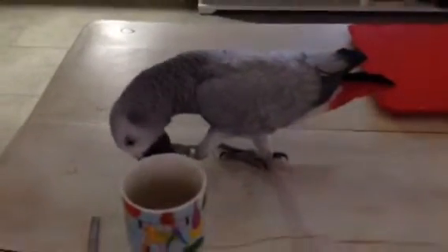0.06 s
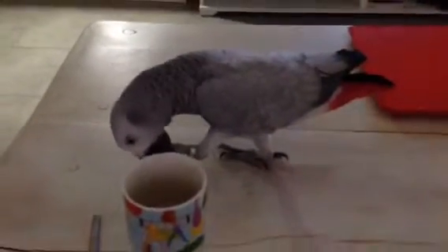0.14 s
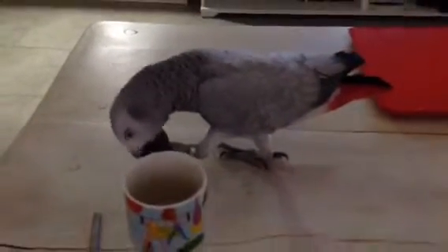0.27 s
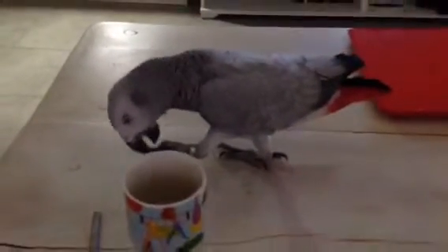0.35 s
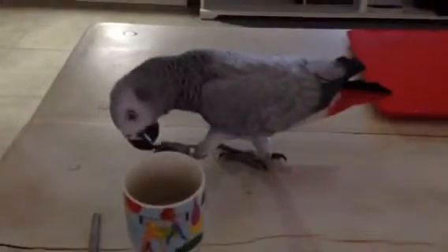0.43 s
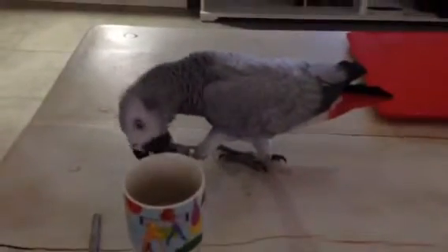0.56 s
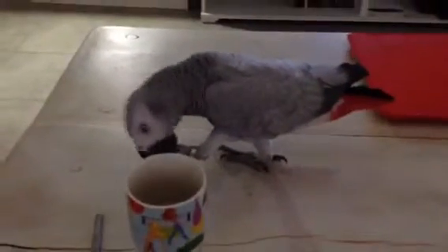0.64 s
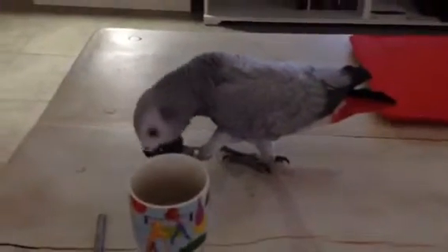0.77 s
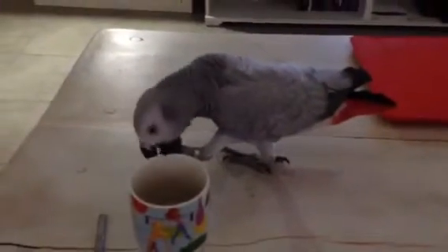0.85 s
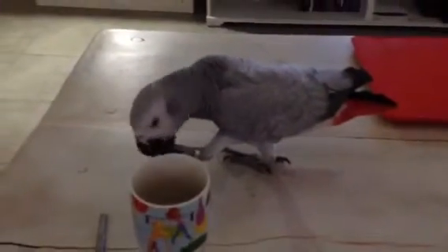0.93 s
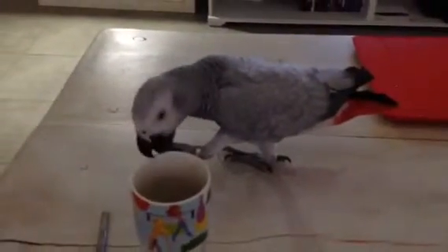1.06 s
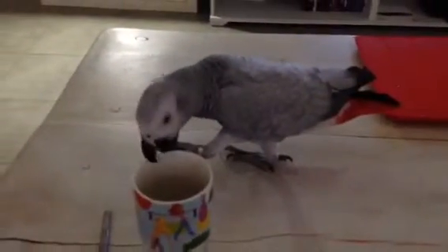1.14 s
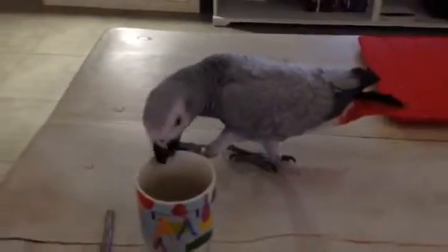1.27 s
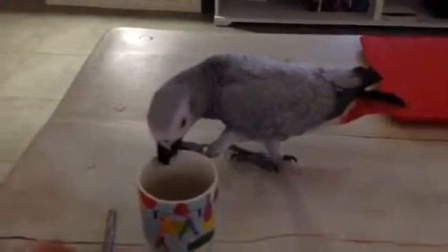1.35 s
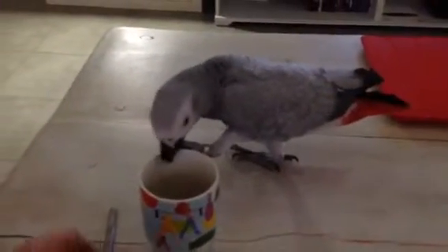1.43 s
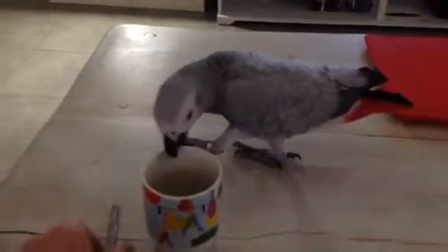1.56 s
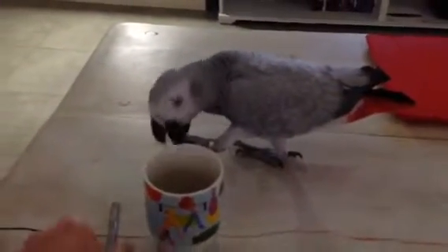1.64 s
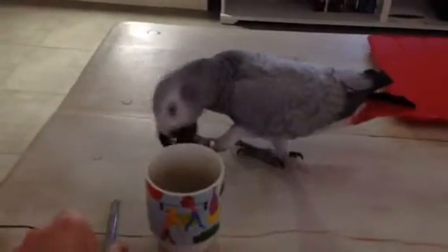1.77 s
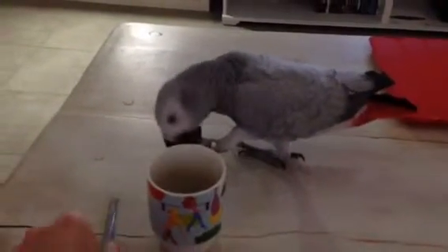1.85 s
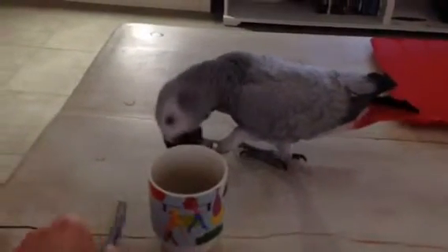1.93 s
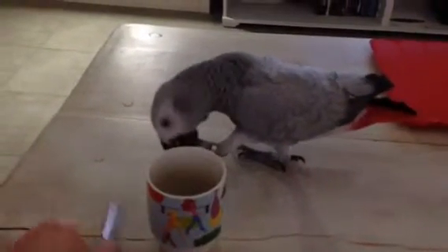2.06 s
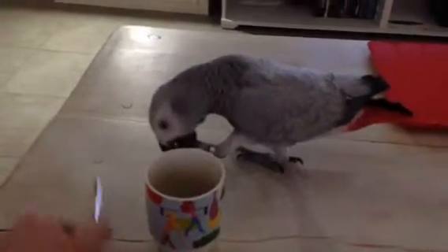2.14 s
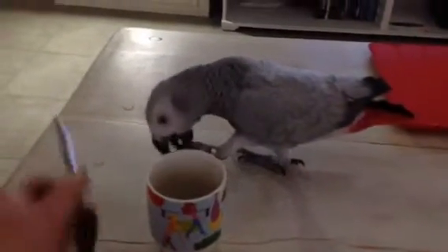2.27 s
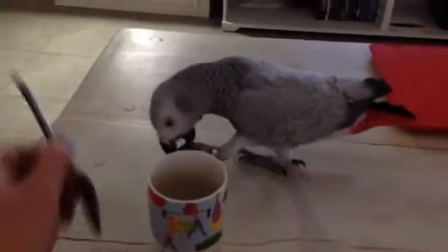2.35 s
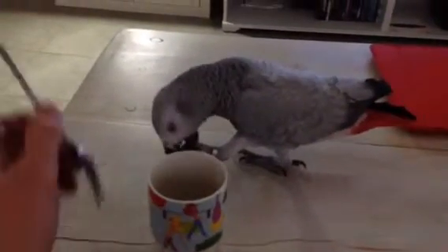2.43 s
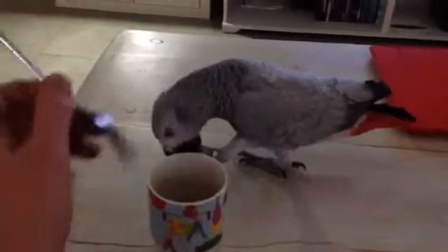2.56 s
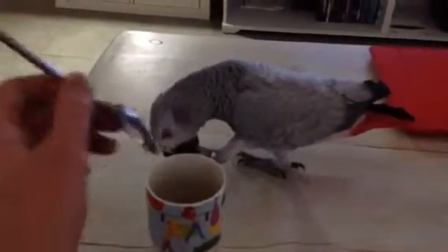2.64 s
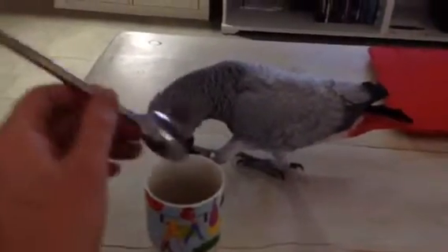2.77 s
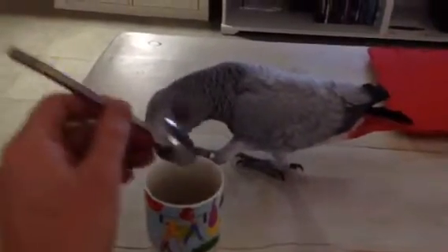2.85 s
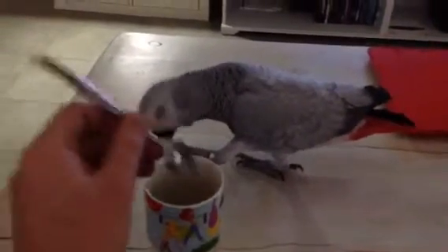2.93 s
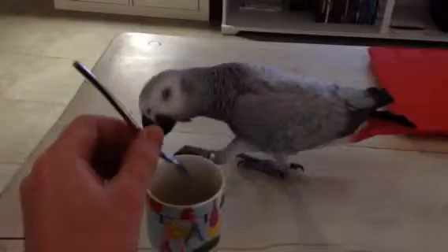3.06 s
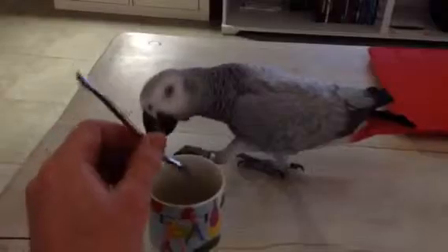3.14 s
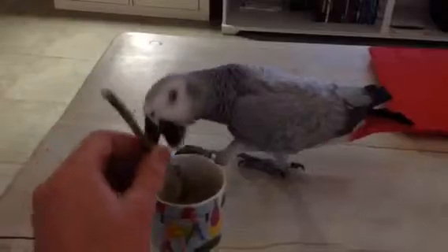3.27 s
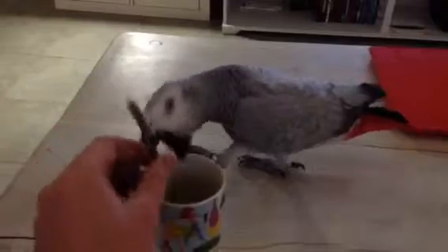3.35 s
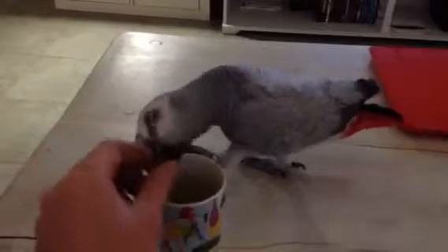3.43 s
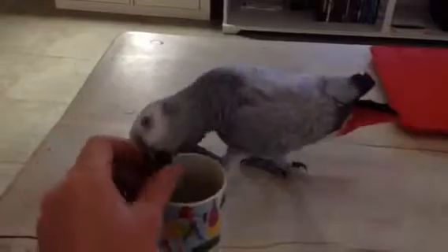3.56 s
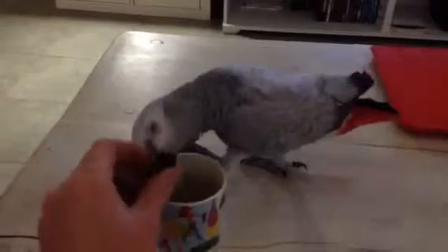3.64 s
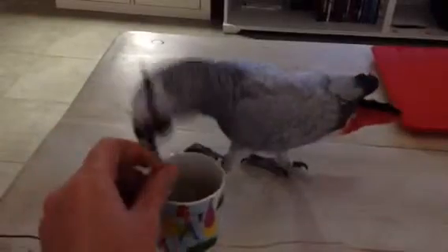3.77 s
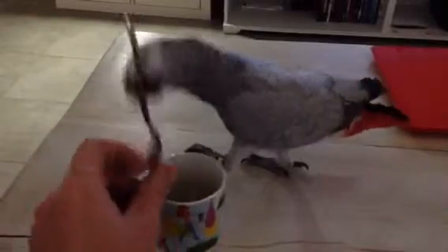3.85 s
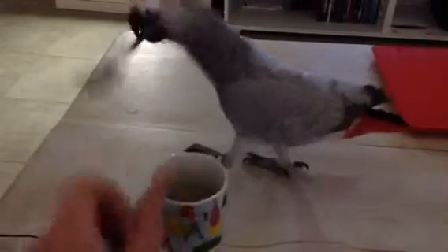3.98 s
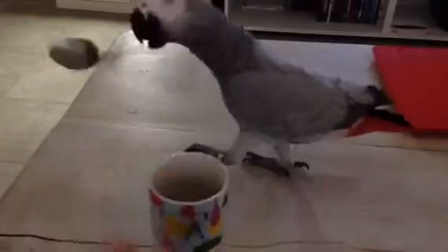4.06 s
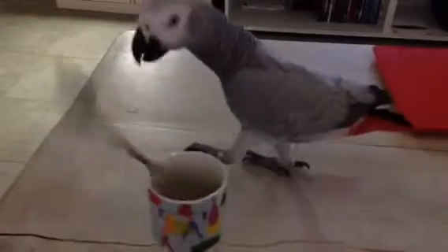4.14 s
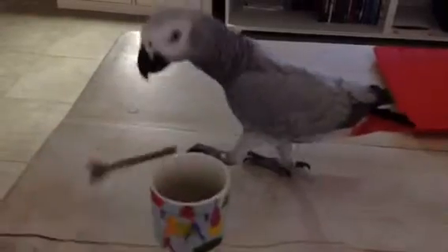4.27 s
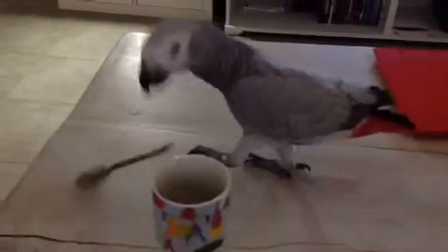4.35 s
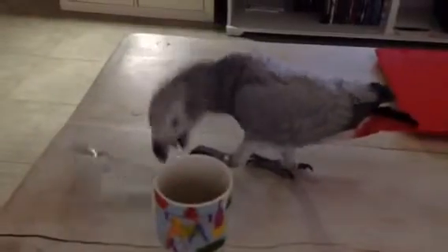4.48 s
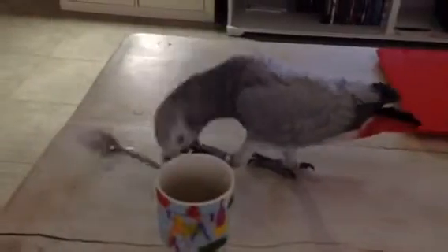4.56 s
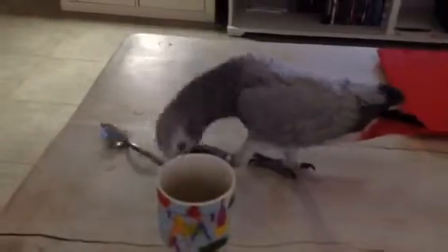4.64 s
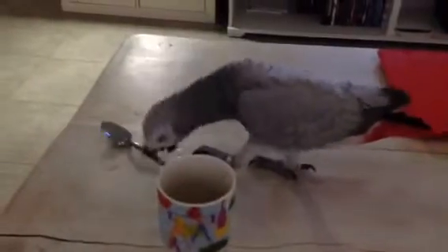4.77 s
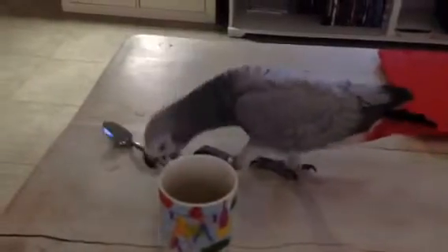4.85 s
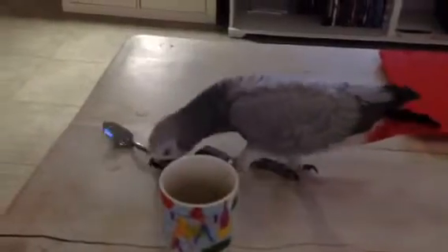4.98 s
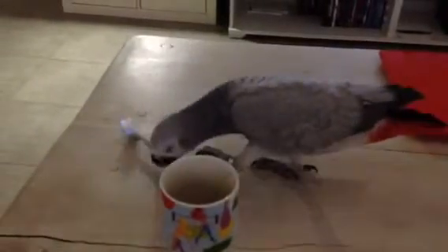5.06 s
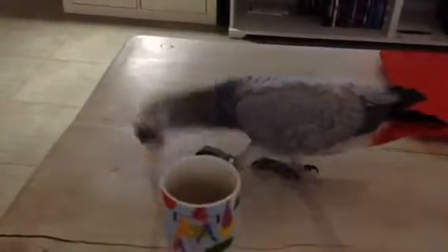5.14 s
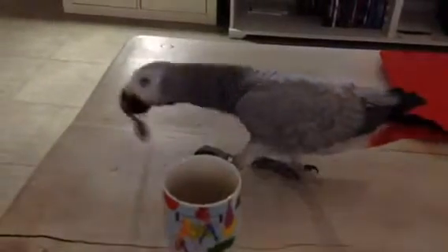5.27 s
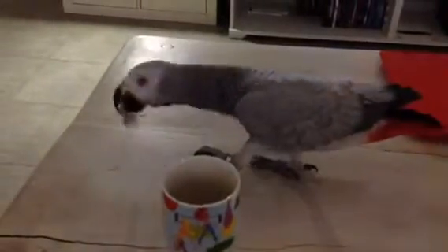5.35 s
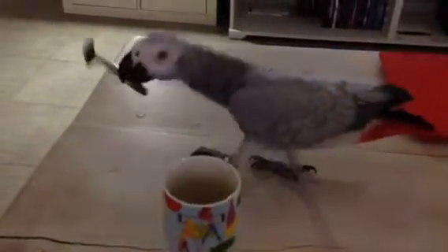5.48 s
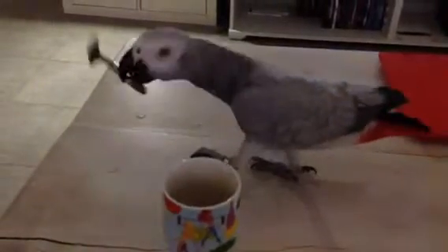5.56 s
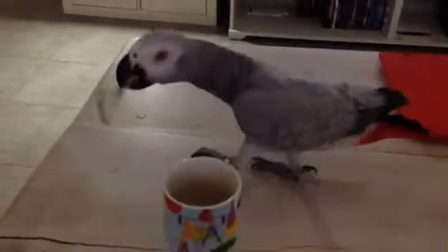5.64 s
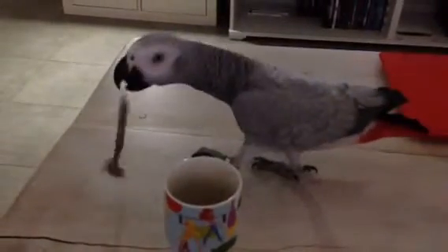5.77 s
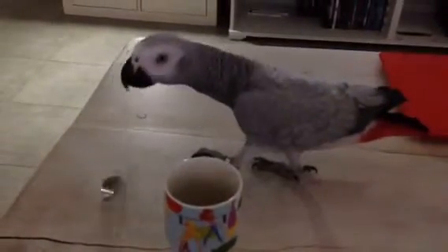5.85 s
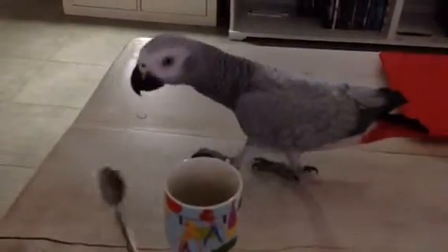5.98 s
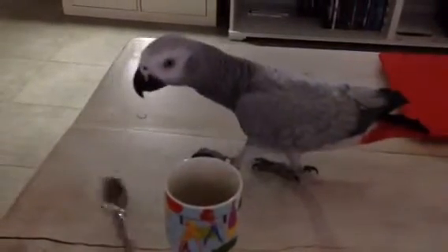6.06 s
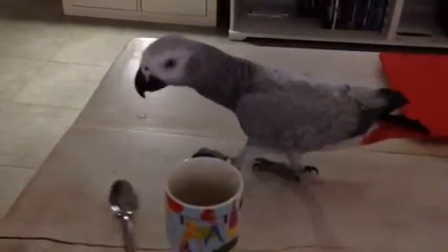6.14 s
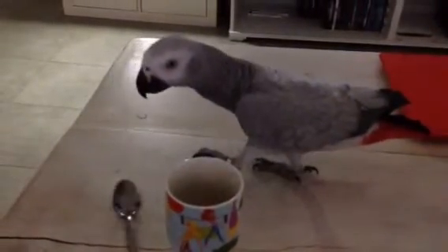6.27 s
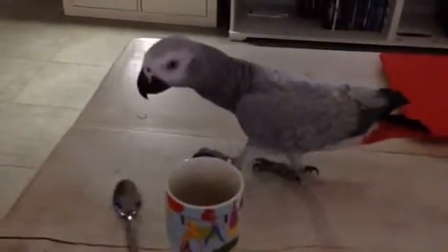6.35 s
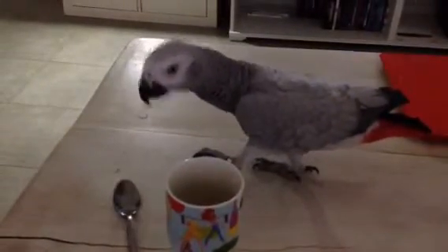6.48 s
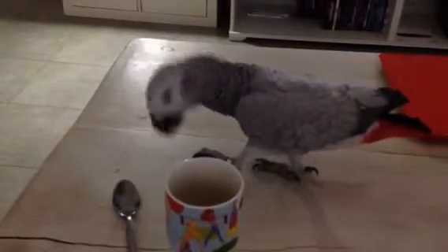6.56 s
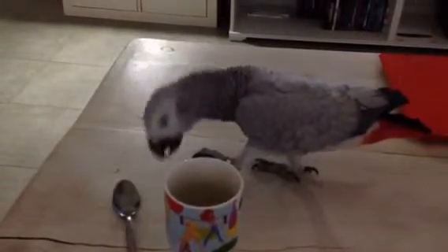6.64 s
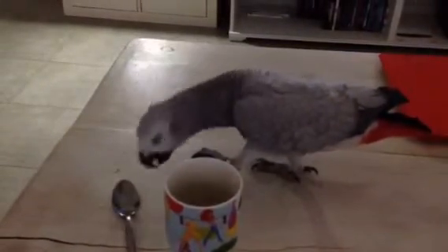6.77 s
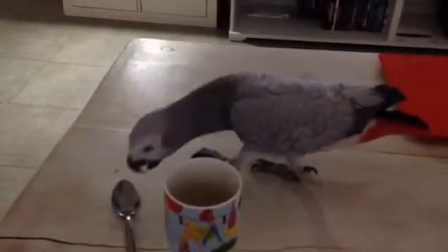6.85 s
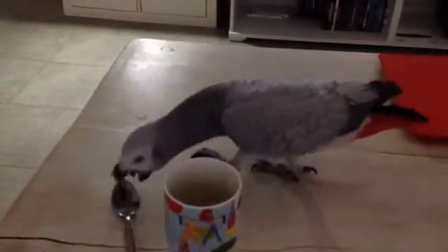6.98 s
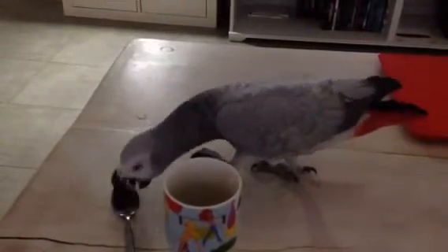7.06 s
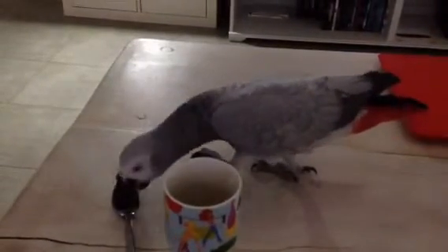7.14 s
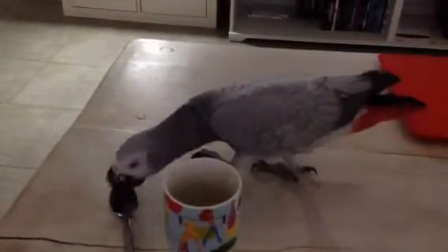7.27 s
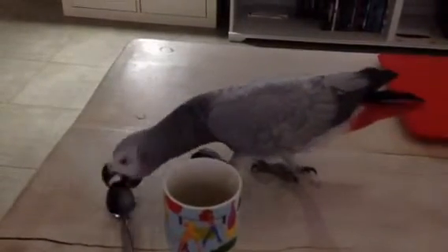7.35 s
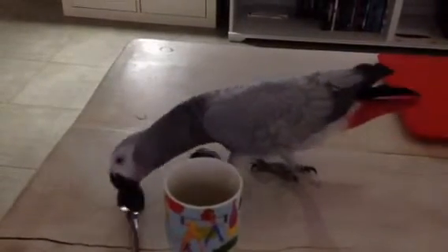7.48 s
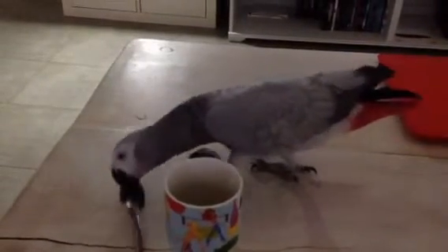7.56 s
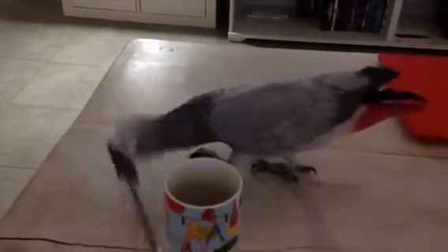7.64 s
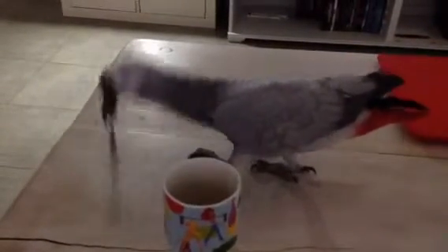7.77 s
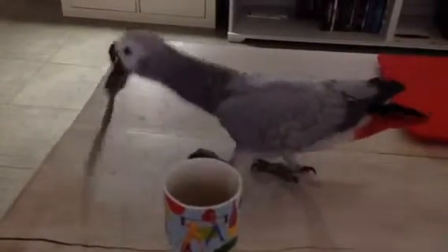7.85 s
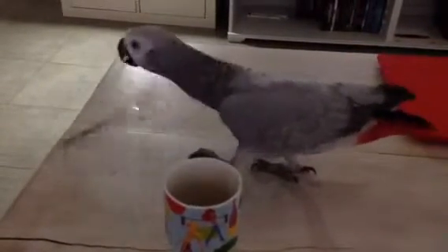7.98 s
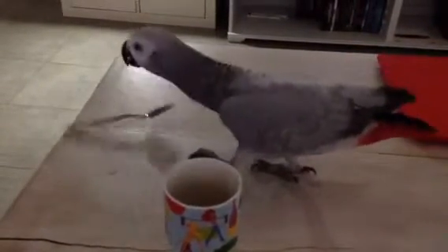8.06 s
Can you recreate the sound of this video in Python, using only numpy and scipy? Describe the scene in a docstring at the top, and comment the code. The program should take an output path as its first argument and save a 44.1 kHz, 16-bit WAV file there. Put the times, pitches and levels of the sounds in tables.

```python
"""Over a quiet background, dull thuds sound on a table and a parrot's beak pecks and nibbles at a china mug.
From 3 s a steel teaspoon is pulled out of the mug, and both ring with their own pitches.
The parrot throws the spoon three times: it bounces and chatters from 4.4 s, again around 6 s after a patter
of feet, then slides at 7.7 s, rattles and lands hard just before the end. Bursts of coloured noise make the
knocks, fading sine waves make the ringing, and a small living room echoes all but the background."""
import sys
import numpy as np
from scipy import signal
from scipy.fft import rfft, irfft, next_fast_len
from scipy.io import wavfile
from scipy.ndimage import uniform_filter1d

SR = 44100
rng = np.random.default_rng(int(sys.argv[2]) if len(sys.argv) > 2 else 0)


def persist_wave(psi):
    """Save psi, clipped to +-1, as 16-bit WAV."""
    counts = np.round(np.clip(psi, -1, 1) * 32767).astype(np.int16)
    wavfile.write(sys.argv[1], SR, np.atleast_2d(counts).T)


N = 357651
T = np.arange(N) / SR  # time in s

# All levels are relative: the mix adds its own gains. "60 dB" times say how long a sound takes to fade by 60 dB.
# Colours of the noises, scaled to unit power when used: pitch_hz, level_db (per Hz)
BACKGROUND_COLOUR = [(15, -44), (25, -22.5), (69, -11), (91, 0.5), (183, -4), (215, -8.5), (253, -3.5),
                     (322, -11.5), (410, -7), (614, -16.5), (666, -15), (945, -14.5), (1050, -19.5),
                     (5280, -26.5), (15500, -32)]
TABLE_COLOUR = [(25, -55.5), (70, -20), (132, -10), (170, -8), (250, -9), (330, -3), (430, 0), (650, -4),
                (900, -1.5), (1300, -8), (3000, -6)]
CLICK_COLOUR = [(40, -37.5), (200, -6.5), (900, -4), (2000, -3.5), (3800, -1.5), (6000, -3), (10000, -11),
                (15000, -18.5)]
CLACK_COLOUR = [(30, -47), (70, -26), (130, -8), (250, -3), (500, -8.5), (950, 3.5), (1500, 1.5), (2300, 1),
                (3500, -4), (5000, -12), (7500, -28), (11000, -46.5)]
TICK_COLOUR = [(60, -49), (500, -24.5), (2500, -23), (3600, 1.5), (5200, -2.5), (6200, -5), (8600, -0.5),
               (10500, -4), (13000, 3), (15500, -10.5)]
RATTLE_COLOUR = [(30, -43), (90, -12), (132, 7), (180, -1), (260, -8), (500, -2), (950, 3.5), (1500, 0.5),
                 (2200, 6), (3000, 0), (4500, -4), (6000, -5), (8000, -31.5), (12000, -39.5)]
BACKGROUND_DB = -67

# echo of the room: pitch_hz, fade_60db_s
ROOM_FADE = [(125, 0.8), (500, 0.65), (2000, 0.57), (5500, 0.34), (9000, 0.37), (14000, 0.16)]

# dull thuds on the table from feet, hand, mug and spoon: start_s, level_db, upper_edge_hz
THUDS = [(.02, -55.5, 513), (.298, -57.5, 520), (.69, -52.5, 806), (1.181, -58, 810), (2.073, -50.5, 2190),
         (2.713, -50, 540), (2.775, -61, 595), (2.95, -50.5, 1700), (3.192, -36, 1100), (3.514, -48, 1311),
         (3.583, -44.5, 582), (3.882, -39, 1115), (4.035, -34, 902.3), (4.155, -52, 500),
         (4.677, -26.5, 820), (5.6, -22, 1094), (5.815, -16.5, 1600), (7.194, -48, 1500), (7.35, -61, 1380),
         (7.488, -45.5, 2200), (7.905, -32.5, 549)]
# the table top booms under the heavier blows: pitch_hz, level_db, fade_60db_s
TABLE_MODES = [(138, -7, 0.2), (418, -12, 0.32), (515, -11.5, 0.18)]
# the parrot shifts its feet: start_s, length_s, final_level_db, swell_db
PATTER = [(5.174, .06, -46, 0.0031), (7.945, 0.127, -38.5, 0)]
# thud of the table under a hard spoon blow, against the clack
LANDING_DB, LANDING_EDGE_HZ = -14.5, 1050

# the beak works at an edge: start_s, length_s, final_level_db, swell_db
NIBBLES = [(.622, 0.055, -56, 3), (1.435, 0.079, -59, 1.5), (7.771, 0.062, -48, -0.5)]
# dry clicks of the beak, and sharp ticks of the spoon at 3.679 and 7.515 s: start_s, level_db
CLICKS = [(.698, -45), (.761, -59), (1.917, -40.5), (2.448, -56), (2.56, -62), (2.95, -74), (3.001, -51),
          (3.547, -44.5), (3.679, -30.5), (5.001, -51), (5.063, -52), (5.233, -54), (7.09, -66),
          (7.193, -60), (7.515, -40)]
# the beak pecks the rim of the mug: start_s, ring_db
PECKS = [(0.66, -52), (.761, -48), (0.857, -60.5), (.928, -66), (1.0, -56.5), (1.496, -59), (1.69, -65),
         (1.916, -51)]
PECK_ANGLE_DEG, PECK_RING_SHARE = 12, 0.28
PECK_OVERTONES_DB, PECK_CLICK_DB = -30, -5  # against the ring

# the spoon knocks on the mug: start_s, ring_db, angle_deg (round the rim from the handle),
# overtones_db (above the ring), ring_share (of the free ring time)
MUG_BLOWS = [(3.003, -49, 26, -35, 0.5), (3.1919, -23, 27.4, -25, 0.77), (3.3516, -26.5, 6, -31, 0.24),
             (3.426, -39, 33, -50.5, 0.95), (3.6137, -37, 40, -24, 0.437), (3.6371, -19, 37, -14.5, 0.46),
             (3.679, -17, 46, -27, 0.2), (3.8817, -22, 27, -7.5, 0.59), (3.961, -31.5, 28, -32.5, 0.82),
             (4.209, -45, 18, -7, 0.88), (4.2295, -10.5, 5, -7, 0.96), (4.3099, -17.5, 23, -29.5, 0.96),
             (4.4092, -25.5, 21, 4, 0.81)]
# pitches that set levels for the hollow, the two rim notes and the overtones: pitch_hz
MUG_GROUPS_HZ = [900, 3430, 3655, 6500]
# notes of the mug: pitch_hz, level_db, fade_60db_s (before the ring share)
MUG_MODES = [(431, -2, .19), (921, -2, .17), (3429, 0, .2), (3655, 0, .27), (5180, -14, .04),
             (5636, -12, .14), (8732, -10, .11), (10250, -3, .16), (10285, -4, .16), (12760, -9, .14),
             (13190, -2, .14), (13550, -10, .16)]
HOLLOW_DB = -19  # the note of the hollow against the ring

# the spoon is struck: start_s, clack_db, tick_db, ring_db, tilt_db (of the ring, per octave),
# place (point of contact as a share of its length)
SPOON_BLOWS = [(3.1916, -39.0, -37, -31.5, -3, 0.573), (3.351, -57, -46, -50.5, -4, 0.34),
               (3.6367, -38, -16, -35.5, 9, 0.93), (3.6798, -57, -29.5, -47.5, 3, 0.81),
               (3.8815, -34, -11, -27, 8.5, 0.31), (4.2291, -20, -15, -23.5, 14.5, 0.135),
               (4.3013, -17, -39.5, -25.0, 5.5, 0.92), (4.311, -47.0, -19.5, -22.0, 2, 0.4),
               (4.4087, -25.5, -22.5, -27.5, 10, 0.258), (4.459, -48, -32, -27.5, 0.5, 0.84),
               (4.5327, -18.5, -39.5, -26, 2.5, 0.501), (4.5504, -28, -44.0, -27.5, 0.5, 0.398),
               (4.6305, -28, -37.5, -38.5, 3, 0.72), (4.6768, -26.5, -46.5, -33.0, 0.5, 0.829),
               (4.749, -21, -31.5, -25, -4.5, 0.82), (5.816, -21.5, -30, -33.5, -7.5, 0.44),
               (5.9443, -31.5, -43.5, -30.5, -3.5, 0.4003), (6.0043, -20, -19.5, -32, 12, 0.21),
               (6.013, -18, -18.5, -20, 7.5, 0.95), (6.037, -22, -27.5, -23.0, -1, 0.61),
               (6.1276, -25, -40.0, -32.5, 9.0, 0.935), (6.146, -27.5, -49, -25.0, 1.5, 0.54),
               (6.1813, -27.0, -53, -27, 0.0, 0.426), (6.2435, -23, -52, -30, -0.5, 0.9),
               (6.3031, -27, -57.5, -35, -5.5, 0.37), (7.194, -63, -75.5, -67.5, 5.5, 0.58),
               (7.4877, -40.5, -39, -38.5, 0.0, 0.062), (7.5158, -63.5, -40.5, -55, 14, 0.92),
               (7.7965, -40.5, -70, -56.5, 3.0, 0.16), (7.945, -60.5, -56, -65, 9, 0.81),
               (7.985, -58.5, -65, -52, 1, 0.395), (8.0975, -13.5, -24, -22, 1.5, 0.405),
               (8.107, -11, -30, -29.5, 2, 0.74)]
# notes of the spoon: pitch_hz, level_db, fade_60db_s (before the ring share)
SPOON_MODES = [(880, -7, .2), (1008, -2, .13), (2215, -15, .42), (3553, 0, .48), (4210, 0, .64),
               (4394, -1, .42), (5800, -7, .04), (6585, -1, .48), (6690, -7, .52), (8920, 0, .48),
               (9680, -5, .42), (11245, -5, .47), (12048, 0, .42), (14710, -5, .42)]
# how the spoon bends near each pitch: pitch_hz, half_waves (along its length), level_db
SPOON_BENDS = [(950, 4.2, 4), (2215, 4.5, 8), (3553, 6.2, -3), (4210, 8, -1), (4394, 9, -.5),
               (6600, 11.1, 3), (8922, 11.5, -2.5), (12050, 11.9, -10)]
NODE_DB = -17.5  # what is left of a note struck on its still point
# fingers or beak hold the spoon and shorten its ring: grip_s, release_s
HELD = [(3, 4.2), (7, 7.9)]
HELD_RING_SHARE, FREE_RING_SHARE = 0.46, 0.95

# a heavy landing jolts the floor: start_s, level_db
JOLTS = [(4.218, -30), (6.004, -38.5)]
JOLT_HZ, JOLT_FADE_S = 52, .07  # the floor swings a few times under a jolt
# the spoon rocks as it settles: start_s, length_s, final_level_db, swell_db
CHATTER = [(4.4, .37, -38.5, 9), (6.02, .22, -37, 1.5), (7.76, 0.036, -58.5, 3), (7.95, .13, -64, 14.5)]
# the spoon slides on the table: start_s, length_s, final_level_db, swell_db
SLIDE = (7.69, .1, -51, 13)

FADE_RANGE_DB = 30  # a run of contacts stops after fading this far
TOP_HZ = 15400  # upper limit of the microphone


def amp(db):
    """Turn decibels into gain."""
    return 10 ** (np.asarray(db) / 20)


def fade(t, fade_s):
    """Die away evenly, losing 60 dB in fade_s seconds."""
    return np.exp(-np.log(1000) * t / fade_s)


def on_log_axis(hz, points):
    """Read between (pitch_hz, value) points, with equal room for each octave."""
    point_hz, value = np.transpose(points)
    return np.interp(np.log(hz + 1e-3), np.log(point_hz), value)


def colour(x, spectrum, edge_hz=SR):
    """Filter with the given colour at unit power, falling steeply above an edge, with no sound ahead of its cause."""
    hz = np.arange(len(x) // 2 + 1) * SR / len(x)
    gain = amp(on_log_axis(hz, spectrum)) / np.sqrt(1 + (hz / edge_hz) ** 8)
    log_gain = np.log(gain / np.sqrt(np.mean(gain ** 2)))
    # folding the cepstrum forward in time gives a minimum-phase filter
    cepstrum = irfft(log_gain, len(x))
    cepstrum[1:len(x) // 2] *= 2
    cepstrum[len(x) // 2:] = 0
    return irfft(rfft(x) * np.exp(rfft(cepstrum)), len(x))


def noise(envelope, spectrum, edge_hz=SR):
    """Random vibration that follows a loudness curve and has the given colour."""
    size = next_fast_len(len(envelope), True)
    shake = envelope * rng.choice([-1, 1], len(envelope))
    padded = np.pad(shake, (0, size - len(envelope)))
    return colour(padded, spectrum, edge_hz)[:len(envelope)]


def add(track, start_s, sound):
    """Mix a sound into a track at a time."""
    i = max(int(start_s * SR), 0)
    track[i:i + len(sound)] += sound[:max(N - i, 0)]


def bursts(rows, spectrum, fade_s):
    """A quickly dying noise for each blow; rows hold start_s, level_db and perhaps upper_edge_hz."""
    out = np.zeros(N)
    envelope = fade(T[:SR // 5], fade_s)
    for start_s, level_db, *edge_hz in rows:
        add(out, start_s, amp(level_db) * noise(envelope, spectrum, *edge_hz))
    return out


def swell(t, run, fall_db_per_s):
    """Level in dB of a run that grows evenly to its end and then dies away."""
    start_s, length_s, final_db, swell_db = run
    past_end = t - start_s - length_s
    growth_db = swell_db * np.minimum(past_end / length_s, 0)
    return final_db + growth_db - fall_db_per_s * np.maximum(past_end, 0)


def flurry(runs, per_second, scatter_db, fall_db_per_s):
    """Rows of start_s, level_db for small contacts, uneven in spacing and strength."""
    rows = []
    for run in runs:
        start_s, length_s = run[:2]
        spacing, luck = rng.standard_normal((2 ** 8, 2)).T
        gaps = np.exp(.4 * spacing) / per_second
        times = start_s + np.cumsum(gaps) - gaps[0]
        level_db = swell(times, run, fall_db_per_s) + scatter_db * np.clip(luck, -2, 1.5)
        kept = times < start_s + length_s + FADE_RANGE_DB / fall_db_per_s
        rows += list(zip(times[kept], level_db))
    return rows


def wander(per_second):
    """Random swaying between per_second fresh values a second, with a spread near 1."""
    knots = np.arange(0, T[-1] + 1, 1 / per_second)
    return np.interp(T, knots, rng.standard_normal(len(knots)))


def ring(times, levels_db, groups_hz, modes, ring_share, sway, sway_rate):
    """Notes of a struck body: each contact restarts them; they waver in strength and phase as they die away."""
    last = np.maximum(np.searchsorted(times, T, side="right") - 1, 0)  # the latest blow at each moment
    age = np.maximum(T - times[last], 0) / np.maximum(ring_share, .1)[last]  # a small share ages faster
    out = np.zeros(N)
    for pitch_hz, level_db, fade_s in modes:
        blow_db = np.array([np.interp(pitch_hz, groups_hz, row) for row in levels_db])
        swing = amp(level_db + blow_db)
        start_phase = 2 * np.pi * rng.random(len(times))
        envelope = (T >= times[0]) * swing[last] * np.exp(sway * wander(sway_rate)) * fade(age, fade_s)
        phase = start_phase[last] + sway * wander(sway_rate)
        # a contact lasts about half a millisecond, so the swing changes smoothly
        motion = uniform_filter1d(envelope * np.exp(1j * phase), size=24)
        out += np.imag(motion * np.exp(2j * np.pi * pitch_hz * T))
    return out


def background():
    """Low murmur of the house under a thin, even hiss: steady coloured noise."""
    return noise(np.full(N, amp(BACKGROUND_DB)), BACKGROUND_COLOUR)


def room(gap_s=0.0013, build_s=0.0027):
    """Diffuse echo of the room with unit energy: noise in bands, each fading at its own speed."""
    t = T[:SR]
    hz = np.arange(SR // 2 + 1)
    white = rfft(rng.standard_normal(SR))
    centres_hz = np.geomspace(100, 16000, 9)
    tail = 0
    for centre_hz, weights in zip(centres_hz, np.eye(len(centres_hz))):
        band = irfft(white * on_log_axis(hz, np.c_[centres_hz, weights]), SR)
        tail = tail + band * fade(t, on_log_axis(centre_hz, ROOM_FADE))
    tail *= 1 - np.exp(-np.maximum(t - gap_s, 0) / build_s)
    return tail / np.sqrt(np.sum(tail ** 2))


def table(step_edge_hz=1250):
    """Dull thuds, hard spoon blows and steps shake the table top; the heavier thuds leave it humming."""
    hard = [(start_s, clack_db) for start_s, clack_db, *_ in SPOON_BLOWS if clack_db > -23]
    landings = [(start_s, clack_db + LANDING_DB, LANDING_EDGE_HZ) for start_s, clack_db in hard]
    blows = list(THUDS) + landings
    patter = flurry(PATTER, per_second=42, scatter_db=1, fall_db_per_s=600)
    steps = [(start_s, level_db, step_edge_hz) for start_s, level_db in patter]
    out = bursts(blows + steps, TABLE_COLOUR, fade_s=.12)
    t = T[:SR]
    boom = np.zeros(len(t))
    for pitch_hz, level_db, fade_s in TABLE_MODES:
        boom += amp(level_db) * np.sin(2 * np.pi * pitch_hz * t) * fade(t, fade_s)
    boom *= 1 - np.exp(-t / .004)  # soft start
    for start_s, level_db, _ in blows:
        if level_db > -35:
            add(out, start_s, amp(level_db - 3.5) * boom)
    return out


def dry_clicks():
    """Short noise bursts: beak nibbling, pecks on the rim, single beak clicks and two sharp ticks of the spoon."""
    pecks = [(start_s, ring_db + PECK_CLICK_DB) for start_s, ring_db in PECKS]
    nibbles = flurry(NIBBLES, per_second=60, scatter_db=1.5, fall_db_per_s=900)
    return bursts(list(CLICKS) + pecks + nibbles, CLICK_COLOUR, fade_s=0.018)


def mug():
    """The handle splits the rim note in two, shared by angle of blow; the hollow adds a low note; contact damps all."""
    pecks = [(start_s, ring_db, PECK_ANGLE_DEG, PECK_OVERTONES_DB, PECK_RING_SHARE)
             for start_s, ring_db in PECKS]
    start_s, ring_db, angle_deg, overtones_db, ring_share = np.transpose(pecks + list(MUG_BLOWS))
    turn = 2 * np.radians(angle_deg)
    lower_db, upper_db = 20 * np.log10(np.abs([np.cos(turn), np.sin(turn)]) + 1e-3)
    levels_db = np.c_[ring_db + HOLLOW_DB, ring_db + lower_db, ring_db + upper_db, ring_db + overtones_db]
    return ring(start_s, levels_db, MUG_GROUPS_HZ, MUG_MODES, ring_share, sway=0.43, sway_rate=60)


def is_held(s):
    """Whether fingers or beak grip the spoon at these times."""
    return np.any([(s > grip_s) & (s < release_s) for grip_s, release_s in HELD], axis=0)


def spoon_contact(china_hz=14500, table_hz=8500):
    """Each blow on the spoon gives a woody clack and a steel tick, both short noise bursts."""
    start_s, clack_db, tick_db, *_ = np.transpose(SPOON_BLOWS)
    on_table = (start_s > 4.44) & ~is_held(start_s)
    # the table is softer than china or beak, so its tick is duller
    edge_hz = np.where(on_table, table_hz, china_hz)
    clack = amp(5.5) * bursts(zip(start_s, clack_db), CLACK_COLOUR, fade_s=.016)
    tick = amp(4.5) * bursts(zip(start_s, tick_db, edge_hz), TICK_COLOUR, fade_s=.01)
    return clack + tick


def spoon_ring():
    """Notes speak when struck between still points; each blow has its own tilt to low or high; a grip damps all."""
    start_s, _, _, ring_db, tilt_db, place = np.transpose(SPOON_BLOWS)
    pitch_hz, half_waves, bend_db = np.transpose(SPOON_BENDS)
    reach = np.hypot(np.cos(np.pi * np.outer(place, half_waves)), amp(NODE_DB))
    octaves = np.log2(pitch_hz / 5000)
    levels_db = ring_db[:, None] + np.outer(tilt_db, octaves) + bend_db + 20 * np.log10(reach)
    ring_share = np.where(is_held(start_s), HELD_RING_SHARE, FREE_RING_SHARE)
    return ring(start_s, levels_db, pitch_hz, SPOON_MODES, ring_share, sway=0.44, sway_rate=40)


def jolts():
    """A heavy landing pushes the floor, which gives one deep, short thump."""
    out, t = np.zeros(N), T[:SR // 2]
    thump = np.sin(2 * np.pi * JOLT_HZ * t) * fade(t, JOLT_FADE_S)
    for start_s, level_db in JOLTS:
        add(out, start_s, amp(level_db) * thump)
    return out


def chatter(fade_s=0.018):
    """The spoon rocks on bowl and handle: a run of tiny uneven bounces."""
    envelope = np.zeros(N)
    bounce = fade(T[:SR // 10], fade_s)
    for start_s, level_db in flurry(CHATTER, per_second=150, scatter_db=4, fall_db_per_s=95):
        add(envelope, start_s, amp(level_db) * bounce)
    return noise(envelope, RATTLE_COLOUR)


def slide(steel_hz=1550, width_hz=170):
    """Steel dragged over the table top rasps in one narrow band of noise."""
    band = [(300, -40), (steel_hz - 2 * width_hz, -13), (steel_hz, 0),
            (steel_hz + 2 * width_hz, -10), (6000, -36)]
    envelope = (T > SLIDE[0]) * amp(swell(T, SLIDE, fall_db_per_s=400))
    return noise(envelope, band)


def scene():
    """Mix all sources and send each, except the background, to the room."""
    thuds = table() + jolts()
    clicks = amp(1.5) * dry_clicks()
    china = amp(2.5) * mug()
    contact = spoon_contact()
    steel = amp(-0.5) * spoon_ring()
    rattle = amp(6.5) * chatter() + slide()
    sent = amp(-8.0) * thuds + amp(-7.5) * clicks + amp(-10.5) * china
    sent += amp(-5.5) * contact + amp(-12.5) * steel + amp(-5) * rattle
    echo = signal.fftconvolve(sent, room())[:N]
    return (background() + thuds + clicks + china + contact + steel + rattle + echo)[None]


def record(dry):
    """The microphone rounds the loudest peaks and the top is cut."""
    ceiling = 0.75
    rounded = ceiling * np.tanh(dry / ceiling)
    top_cut = signal.ellip(8, .2, 70, TOP_HZ, fs=SR, output="sos")
    return signal.sosfilt(top_cut, rounded)


dry = scene()
out = record(dry)
persist_wave(out)
```